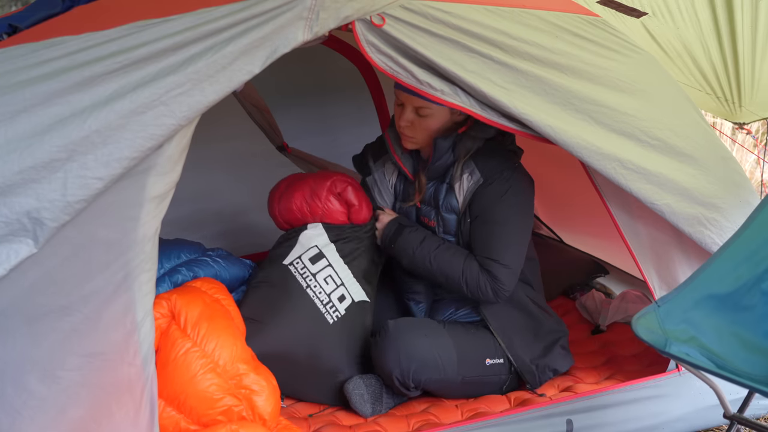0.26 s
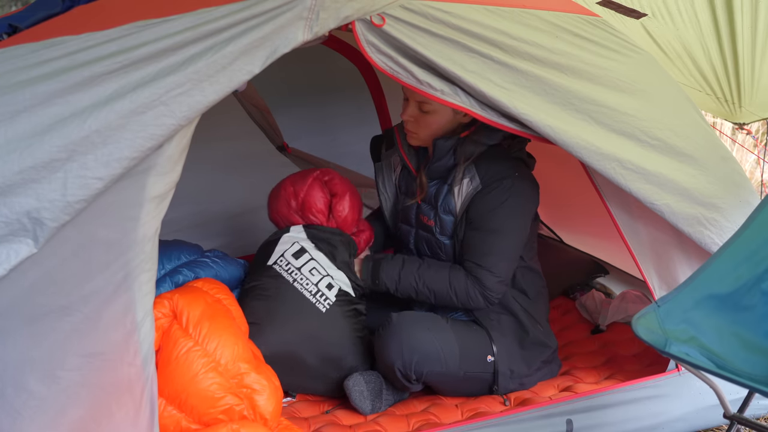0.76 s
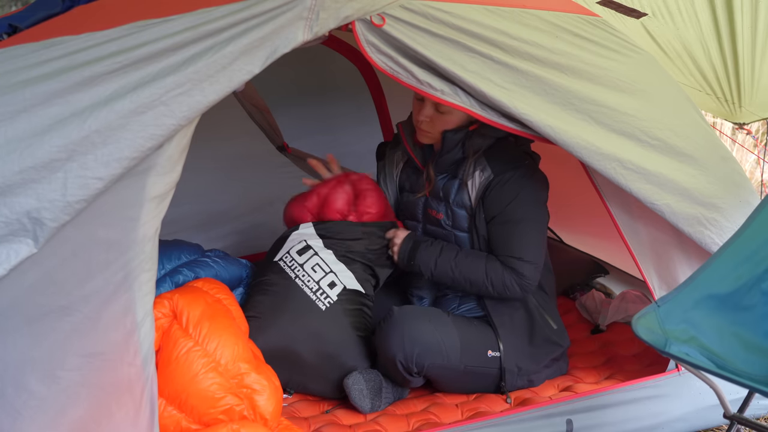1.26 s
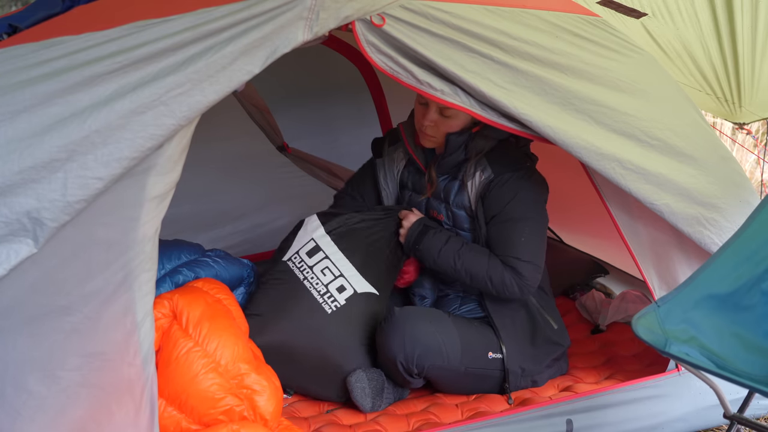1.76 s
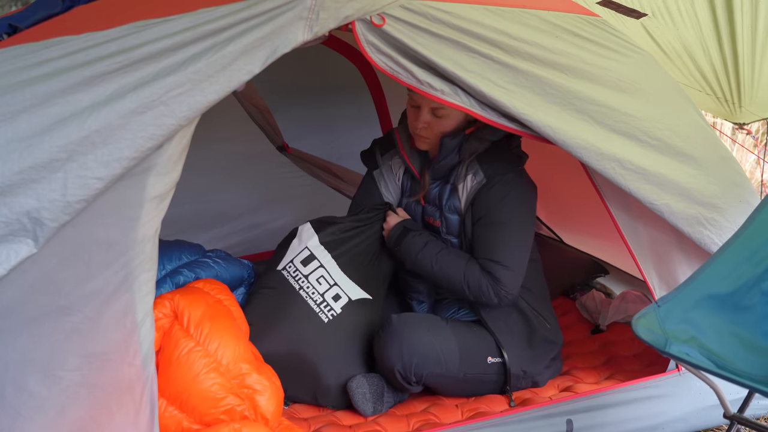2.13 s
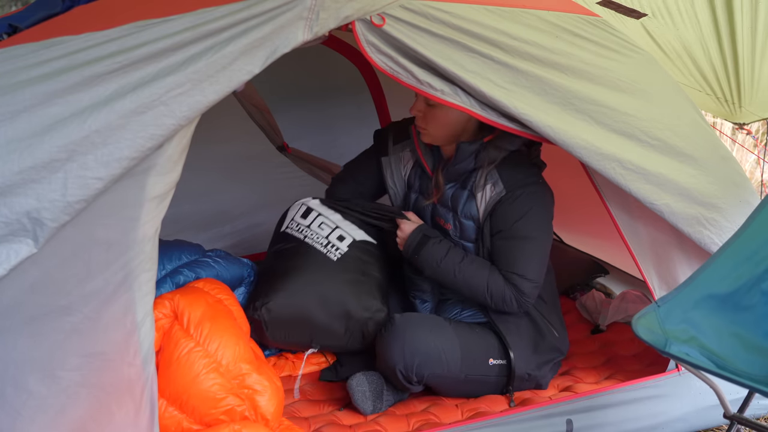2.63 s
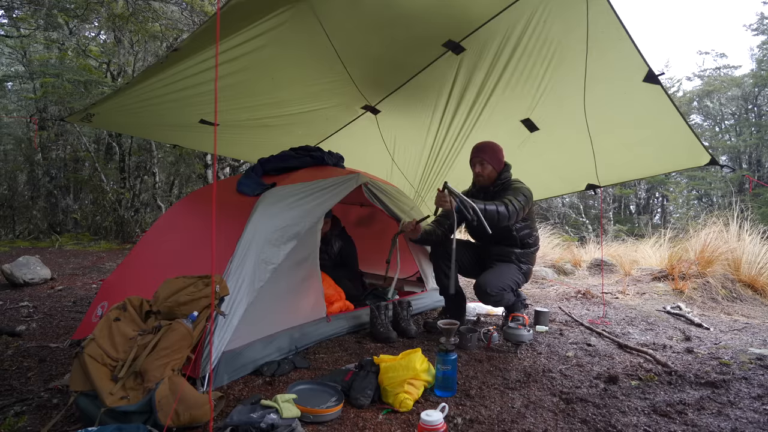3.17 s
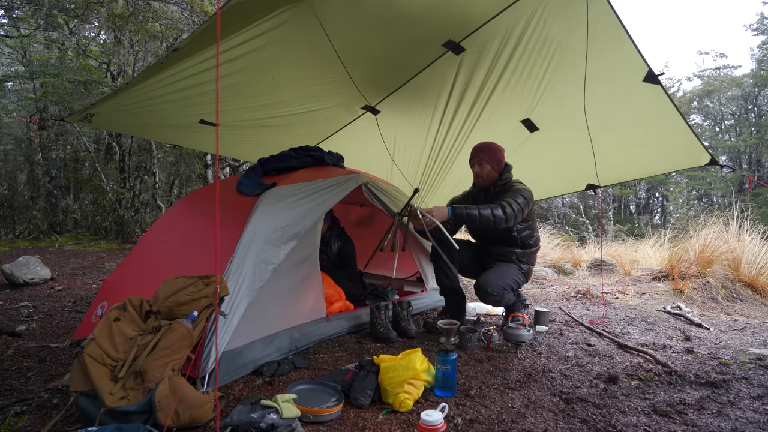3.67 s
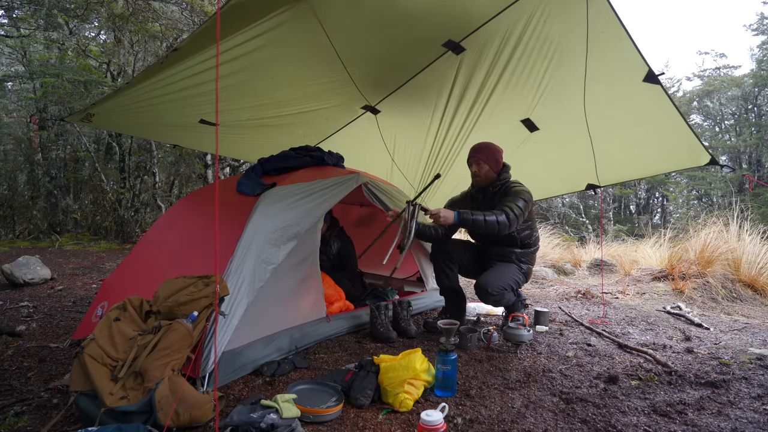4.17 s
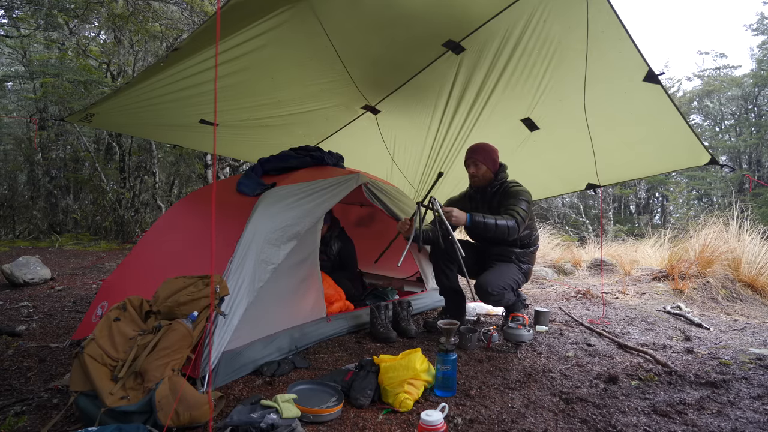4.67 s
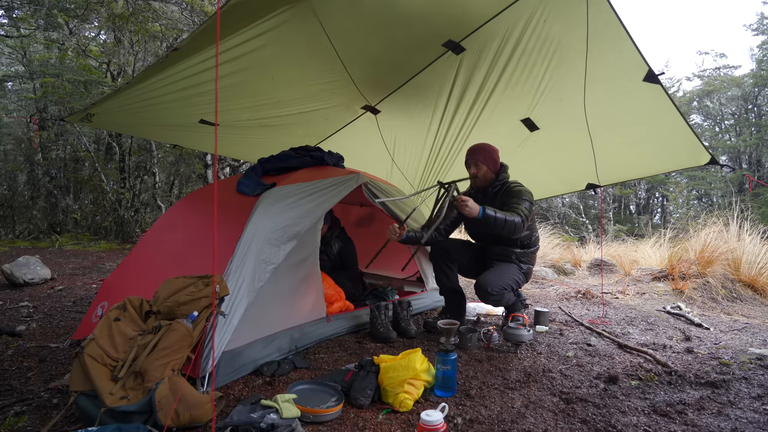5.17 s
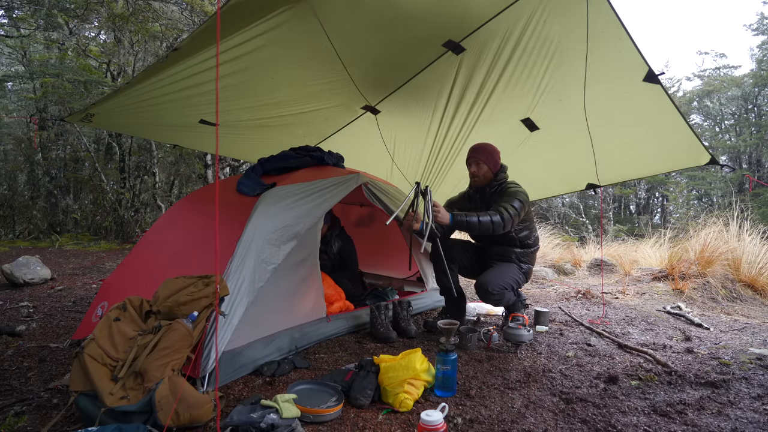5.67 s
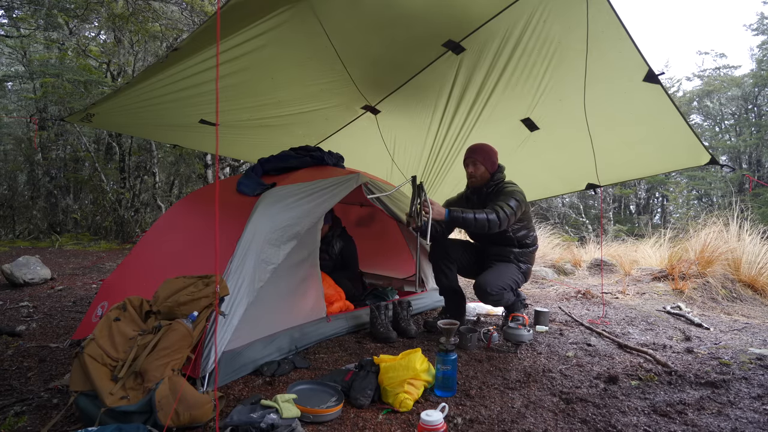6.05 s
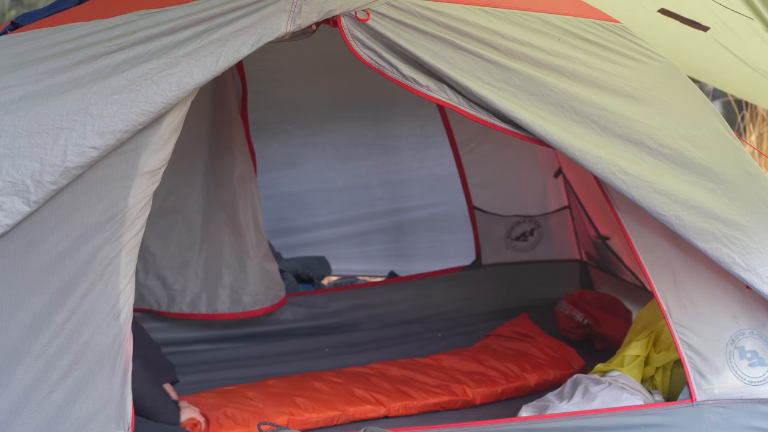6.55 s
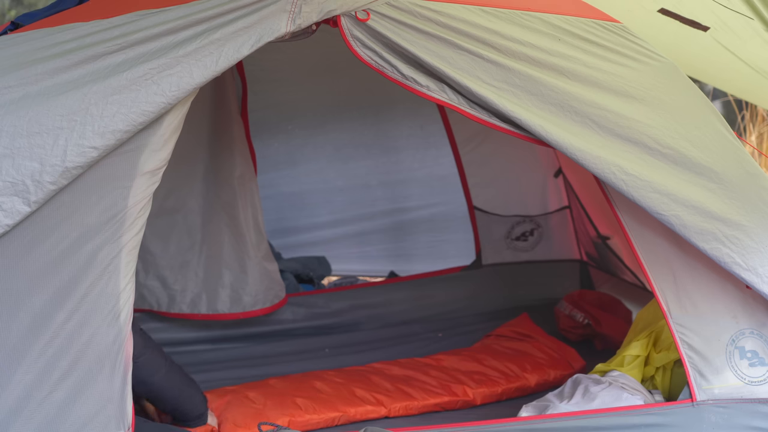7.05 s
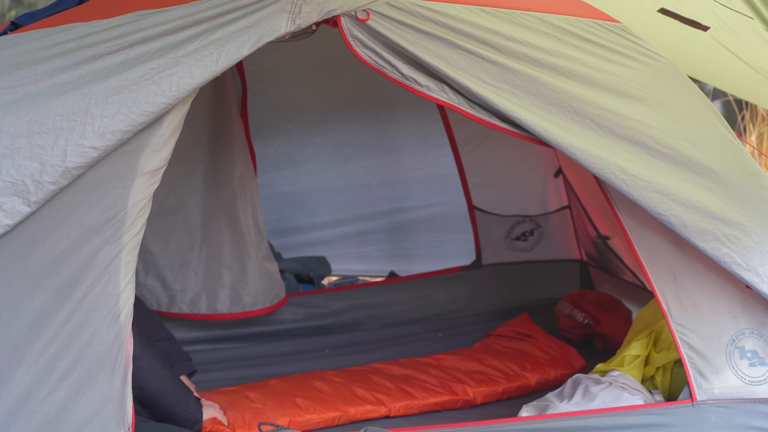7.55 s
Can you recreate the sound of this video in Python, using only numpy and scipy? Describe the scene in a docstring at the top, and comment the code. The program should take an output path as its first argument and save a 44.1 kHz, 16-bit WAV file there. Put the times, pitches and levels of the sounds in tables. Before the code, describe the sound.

From 0 to 2.9 s, close at a tent door, slippery nylon is pushed into a sack. A strong bright swish opens, with a hard cloth snap at 0.14 s; shorter, softer hisses follow to 0.9 s, with a dull bump near 0.7. Quiet reswelling, pops around 1.3, then a growing push and a fuller, longer swish from 1.8 to 2.15, and weaker rubs to 2.85. At about 2.9 the place changes to open forest: light metal tubes graze and tick, then clack densely from 3.3 to 4.15, sparser until 4.8. A sharp crack at 4.9 leads to strong, ringing clacks around 5.15, 5.36, 5.47, 5.62 and 5.88, with a last crack near 6.17. From 6.25 to 8 s, a pad is pressed in soft, dull rustles with tiny ticks. A distant stream murmurs low, fainter during the chair.

```python
"""Packing up a forest camp

A nylon sleeping bag slides into its stuff sack: noise hisses with each push, and short pulses snap the cloth taut.
Corded metal tubes of a folding chair clack together over a tarp: each contact rings a dense set of modes.
Last, a sleeping pad is pressed and rustles softly, while low noise murmurs as a far-off stream.
Sack and pad are heard at the tent door, the chair in the open; both output channels are alike."""
import sys
import numpy as np
from scipy import signal
from scipy.fft import rfft, irfft, next_fast_len
from scipy.io import wavfile
from scipy.ndimage import uniform_filter1d

SR = 44100
rng = np.random.default_rng(int(sys.argv[2]) if len(sys.argv) > 2 else 0)


def materialize(psi):
    """Save the field psi as 16-bit PCM at rate SR to the path in sys.argv[1].

    A 1-D psi becomes a single channel; in a 2-D psi each row is a channel.
    """
    bounded = np.clip(np.atleast_2d(psi).T, -1, 1)
    quanta = np.round(bounded * 32767).astype(np.int16)
    wavfile.write(sys.argv[1], SR, quanta)


N = 344411

# the microphone stands in the open between these times, at the tent door otherwise
OPEN_FROM_S, OPEN_TO_S = 2.88, 6.25
# moves while folding the chair: (start [s], length [s], level [dB], swell over the move [dB])
MOVES = [(2.97, 0.035, -41, -4), (3.479, 0.7, -47.5, -0.5), (4.279, 0.13, -47, -0.5),
         (5.053, 0.043, -35, 1), (5.132, 0.19, -46, -4)]
# light touches of tube on tube: hollower than full blows, with a short chatter
TOUCH_HOLLOW_DB, TOUCH_CHATTER_S = 5.5, 0.0026


def amp(db):
    """Amplitude factor of a level in dB."""
    return 10 ** (np.asarray(db) / 20)


def unit(x):
    """Scales x to an rms of 1."""
    return x / np.sqrt(np.mean(x ** 2) + 1e-20)


def add(mix, start_s, sound):
    """Adds a sound into the mix in place, cut at the mix's end."""
    part = mix[max(round(start_s * SR), 0):][:len(sound)]
    part += sound[:len(part)]


def during(from_s, to_s):
    """1 between two times, with short fades."""
    t = np.arange(N) / SR
    return uniform_filter1d(1. * ((t >= from_s) & (t <= to_s)), size=300)


def colour(x, points):
    """Filters x by a spectrum of (frequency [Hz], gain [dB]) points."""
    size = next_fast_len(len(x) + 2048)
    hz, db = np.transpose(points)
    bin_hz = np.fft.rfftfreq(size, 1 / SR)
    gain = amp(np.interp(np.log(bin_hz + 1), np.log(hz), db))
    return irfft(rfft(x, size) * gain, size)[:len(x)]


def band(x, low_hz, high_hz, order=2):
    """Butterworth band-pass."""
    edges_hz = np.clip([low_hz, max(high_hz, low_hz + 10)], 10, SR / 2 - 100)
    return signal.sosfilt(signal.butter(order, edges_hz, "band", fs=SR, output="sos"), x)


def thirds(x):
    """Splits a sound into body, middle and treble that sum to the whole."""
    body = colour(x, [(1600, 0), (2400, -12), (4000, -60)])
    treble = colour(x, [(4500, -60), (7000, -12), (9500, 0)])
    return body, x - body - treble, treble


def slips(per_s, spread_db):
    """Tiny slips of a rubbing contact: mostly small, a few large."""
    size = amp(spread_db * np.minimum(rng.exponential(1, N), 6))
    happens = rng.random(N) < per_s / SR
    return unit(size * rng.standard_normal(N) * happens)


def waver(depth_db, size):
    """Slow chance changes of contact pressure, smoothed twice over size samples."""
    smooth = uniform_filter1d(uniform_filter1d(rng.standard_normal(N), size), size)
    return amp(depth_db * unit(smooth))


def stroke(start_s, length_s, db, swell_db, rise_s, stop_db_per_s):
    """Power of one rubbing stroke: it gets going, swells or eases while it lasts, then dies away."""
    t = np.arange(max(-start_s, 0), length_s + .5, 1 / SR)
    attack = np.sin(np.pi / 2 * np.clip(t / rise_s, 0, 1)) ** 2
    hold_db = db + swell_db * (np.clip(t / length_s, 0, 1) - .5)
    stop_db = stop_db_per_s * np.maximum(t - length_s, 0)
    power = np.zeros(N)
    add(power, start_s, attack * amp(hold_db - stop_db) ** 2)
    return power


def strokes(rows, rise_s, stop_db_per_s):
    """Power of the middle and of the treble over a run of strokes."""
    middle, treble = np.zeros(N), np.zeros(N)
    for *shape, treble_db in rows:
        power = stroke(*shape, rise_s, stop_db_per_s)
        middle += power
        treble += power * amp(treble_db) ** 2
    return middle, treble


def swells(rows, width):
    """Short swells of noise in a narrow band; width is a share of the centre frequency."""
    out = np.zeros(N)
    for s, db, hz, length_s in rows:
        tone = band(rng.standard_normal(SR), hz / (1 + width), hz * (1 + width))
        tone = tone[-int(length_s * SR):]  # after the filter has settled
        add(out, s, amp(db) * unit(tone * np.hanning(len(tone))))
    return out


def stuffing(rest_db=-60):
    """The weave hisses with each push and as the bag swells back; creases add a fine crackle."""
    # pushes of nylon over nylon:
    # (start [s], length [s], level [dB], swell over the push [dB], treble [dB re middle])
    pushes = [(-0.04, 0.15, -31.5, 1.5, 3.5), (0.255, 0.19, -40.5, 3.5, -2), (0.44, 0.098, -44.5, -1, 1),
              (0.52, 0.16, -41.5, 0, 3.2), (0.67, 0.11, -38.5, 1.5, 5), (0.8, 0.16, -48, -4.5, 2.5),
              (1.17, 0.33, -47, 10.5, 2.5), (1.48, 0.13, -44, 2, 0), (1.56, 0.26, -41.5, 5, 7.5),
              (1.81, 0.34, -34.5, 4, 2.5), (2.32, 0.23, -43, -0.5, -1), (2.52, 0.085, -38.5, -0.5, 2.5),
              (2.6, 0.26, -46, -2.5, -0.5)]
    # spectrum of rubbed nylon: (frequency [Hz], gain [dB])
    nylon = [(180, -44), (300, -4.5), (432, -18), (622, -2.5), (972, -4.5), (1150, -7), (1290, -2.5),
             (1600, -5.5), (2120, 0), (3480, -0.5), (3910, 2), (5440, 0), (13800, 5), (15700, -0.5)]
    rise_s, stop_db_per_s = 0.047, 298
    middle_power, treble_power = strokes(pushes, rise_s, stop_db_per_s)
    # between pushes the squeezed bag swells back
    loft = stroke(0.91, 0.3, -52.5, 0, rise_s, stop_db_per_s)
    loft += amp(rest_db) ** 2
    # the body grows less than the push, so hard pushes are thinner
    body_at_ref_db, body_slope, ref_db = -45.5, 0.85, -40
    push_db = 10 * np.log10(middle_power + loft)
    body_db = body_at_ref_db + body_slope * (push_db - ref_db)

    creases = slips(per_s=2500, spread_db=3.2)
    weave = rng.standard_normal(N) + amp(-8) * creases
    parts = thirds(tent(colour(weave, nylon)))
    body, middle, treble = (unit(part * waver(depth_db=0.6, size=400)) for part in parts)
    hiss = amp(body_db) * body
    hiss += np.sqrt(middle_power + loft) * middle
    hiss += np.sqrt(treble_power + loft) * treble
    return hiss * during(0, OPEN_FROM_S)


def tent(x, bounce_db=-13):
    """A few close bounces off the floor and the walls ripple the spectrum."""
    taps = np.zeros(SR // 50)
    delays = rng.integers(SR // 800, SR // 100, size=5)
    taps[delays] = amp(bounce_db) * rng.choice([-1, 1], size=5)
    taps[0] = 1
    return signal.oaconvolve(x, taps / np.linalg.norm(taps))[:N]


def snaps():
    """A panel of cloth jerks taut or a crease pops: one pressure pulse, then a short flutter."""
    # (time [s], pulse peak [dB], centre [Hz], flutter decay [s], flutter level [dB re pulse])
    snap_rows = [(0.012, -19.5, 197, 0.0085, -2.5), (0.130, -19, 537, 0.011, 0),
                 (0.1362, -6.5, 640, 0.004, -12.5), (0.139, -13.3, 172, 0.0092, -22),
                 (0.165, -28, 600, .004, -7), (0.269, -29, 484, 0.0066, -7),
                 (0.406, -26, 5000, 0.00089, -15), (0.782, -31.5, 453, .004, -6),
                 (1.251, -27, 4200, 0.0043, -4.5), (1.251, -29.5, 1000, .004, -23),
                 (1.3, -20, 640, 0.0035, -15), (1.2993, -19, 2710, 0.0011, -5),
                 (1.324, -28, 3500, .003, -0.5), (2.247, -34, 680, .004, -22), (2.281, -31, 435, .004, -6),
                 (2.669, -29, 6300, 0.0017, -14), (3.153, -34.5, 382, 0.0097, -2),
                 (3.1515, -26, 2470, 0.0028, -6.5), (3.234, -27.5, 828.5, 0.0054, -3),
                 (3.236, -33, 340, 0.0092, 0.5), (3.446, -20, 834, 0.0027, -16.5),
                 (3.447, -26.5, 290, 0.011, -12), (3.513, -33, 700, 0.003, -0.5),
                 (6.428, -36.5, 1970, 0.0076, -3.5), (6.431, -32, 400, .006, -3),
                 (6.828, -31.5, 4100, 0.0044, -8), (6.926, -26.5, 6200, 0.0012, -9),
                 (7.648, -32, 3160, 0.0097, -6.5), (7.758, -39, 1500, 0.0018, -6)]
    out, t = np.zeros(N), np.arange(-SR // 200, SR // 10) / SR
    for s, db, hz, flutter_s, flutter_db in snap_rows:
        u = (np.pi * hz * t) ** 2
        pulse = (2 * u - 1) * np.exp(-u)
        flutter = unit(band(rng.standard_normal(len(t)), hz * 0.57, hz * 2.18, order=3))
        flutter *= (t > 0) * (1 - np.exp(-u)) * np.exp(-abs(t) / flutter_s)
        add(out, s + t[0], amp(db) * (pulse + amp(flutter_db) * flutter))
    return out


def folds(sack_db=-59, pad_db=-63):
    """Loose folds of the sack and of the pad flop over at random: small dull puffs."""
    puffs = unit(band(slips(per_s=110, spread_db=1.2), 250, 1200))
    level = amp(sack_db) * during(0, OPEN_FROM_S) + amp(pad_db) * during(OPEN_TO_S, N / SR)
    return puffs * level


def bumps():
    """The soft bag bumps the floor: brief swells of low noise."""
    # (time [s], rms level [dB], centre [Hz], length [s])
    bump_rows = [(0.712, -36.5, 140, .085), (1.52, -43.5, 114, 0.03)]
    return swells(bump_rows, width=0.37)


def chair():
    """Tubes of the folding frame graze, clack and rebound, with sharp cracks; open tubes ping."""
    # tube on tube: (time [s], level [dB], hollowness [dB], brightness [dB], chatter [s],
    # strongest ring [Hz], first graze before the blow [s], rebound after it [s]); 0 = none
    clacks = [(2.9531, -31.5, -1, 6, 0.013, 3470, 0.0058, 0),
              (2.9723, -30, 4, 3.5, 0.0032, 3880, 0.00087, 0),
              (3.0552, -32.5, 3, -3, 0.0023, 10500, 0.0067, 0),
              (3.0871, -32, 3.5, 1, 0.0058, 3900, 0, 0.0018),
              (3.1878, -28, 2, 0, 0.0021, 3930, 0.003, 0.00064),
              (3.2869, -19, 0.5, 0.5, 0.0026, 4470, 0.021, 0),
              (3.3576, -19.5, -1, 0, 0.018, 5800, 0, 0.00052),
              (3.37, -19.5, -1, 6.5, 0.0054, 9800, 0.0048, 0.00084),
              (3.406, -26, -4, 7, 0.0022, 6850, 0.012, 0.0024),
              (3.481, -27.5, 3, -1, 0.002, 4370, 0.001, 0), (3.5565, -22, 4, 3, 0.0074, 2940, 0, 0),
              (3.609, -34, -9, 3, 0.0047, 3930, 0, 0.00065), (3.6534, -14, 2.5, 6, 0.0064, 4920, 0, 0.017),
              (3.7218, -18, 0, 12, 0.0055, 4800, 0.013, 0),
              (3.79, -31.5, -3, 1, 0.0095, 4410, 0.013, 0.00048), (3.83, -19, -2, 8, 0.0082, 6400, 0, 0),
              (3.9693, -21, -6, 10, 0.005, 15200, 0.016, 0.0015),
              (4.0209, -24, 1.5, 4.5, 0.0067, 3860, 0.013, 0),
              (4.0636, -20, -3, 1, 0.0083, 4533, 0.0018, 0), (4.0703, -21.5, -1, -7, 0.0011, 4200, 0, 0),
              (4.1285, -19, -4.5, 3, 0.0023, 4600, 0, 0.00019), (4.2728, -40, 1, -5, 0.00081, 4010, 0, 0),
              (4.367, -36.5, 10, 2.5, 0.0032, 6996, 0.00084, 0),
              (4.4805, -22, 2.5, 3.5, 0.0023, 15120, 0.026, 0), (4.6048, -36, 7.5, -8, 0.0021, 4160, 0, 0),
              (4.8853, -21.5, 1.5, 8.5, 0.0032, 7346, 0.012, 0.018),
              (4.986, -20.5, 4, 1.5, 0.0039, 5235, 0, 0),
              (5.062, -30.5, 5, 1, 0.0022, 3384, 0.0072, 0.0022),
              (5.0874, -29.5, 3, -4, 0.00098, 3130, 0.0075, 0),
              (5.1348, -19, 1, 2, 0.015, 4460, 0.00025, 0.0005),
              (5.1406, -15, 2.5, 2, 0.00344, 3065, 0.00089, 0), (5.2799, -28, 3, 1.5, 0.0037, 5600, 0, 0),
              (5.363, -13.5, 0, -6.5, 0.0083, 5660, 0.0055, 0),
              (5.3953, -25.5, -10, 1, 0.0074, 3270, 0.0018, 0.0015),
              (5.4693, -16.3, -0.5, 5.5, 0.0066, 7440, 0.017, 0.01),
              (5.5169, -27.5, 0.5, -7, 0.00081, 4280, 0, 0.002),
              (5.558, -28.5, 4, -16, 0.0023, 2562, 0.00038, 0),
              (5.6242, -17.5, 2, 4, 0.0046, 5900, 0, 0.0084),
              (5.868, -33.5, -1, -6, 0.00054, 4650, 0.0024, 0),
              (5.885, -18.5, -4, 5.5, 0.0079, 4040, 0, 0.00019),
              (6.132, -27.5, -4.5, 6.5, 0.0064, 3740, 0.028, 0), (6.1725, -34, -7, 1, 0.00095, 4330, 0, 0)]
    # a tube end seats dry into its socket with a sharp crack, mostly within a clack: (time [s], level [dB])
    cracks = [(3.189, -19), (3.969, -24), (4.130, -6.5), (4.885, -10), (4.892, -2), (6.150, -16),
              (6.175, -10), (6.246, -25)]
    # the air in an open tube pings: (time [s], level [dB], frequency [Hz])
    pings = [(3.287, -20.5, 1385), (5.108, -31, 1345), (5.258, -36.5, 1466), (5.3628, -24, 1064),
             (5.395, -29, 1170), (5.776, -41, 1325), (5.969, -37, 1350), (6.197, -42, 2120),
             (6.222, -50, 1490)]
    # grazes and rebounds are weaker than their blow
    graze_db, graze_bright_db, graze_hz = -17, -1, 4700
    rebound_db, rebound_dull_db, rebound_chatter_s = -3.5, -9.5, 0.004
    out, t = np.zeros(N), np.arange(SR // 200) / SR
    for s, db, hollow_db, bright_db, chatter_s, ring_hz, graze_s, rebound_s in clacks:
        add(out, s, clack(db, hollow_db, bright_db, chatter_s, ring_hz))
        if graze_s:
            graze = clack(db + graze_db, TOUCH_HOLLOW_DB, graze_bright_db, TOUCH_CHATTER_S, graze_hz)
            add(out, s - graze_s, graze)
        if rebound_s:
            dulled_db = bright_db + rebound_dull_db
            rebound = clack(db + rebound_db, hollow_db, dulled_db, rebound_chatter_s, ring_hz)
            add(out, s + rebound_s, rebound)
    for s, db in cracks:
        add(out, s, amp(db) * np.cos(2 * np.pi * 7000 * t) * np.exp(-t / .00015))
    for s, db, hz in pings:
        add(out, s, ping(db, hz))
    return band(out + rattle(), 456, 21950, order=3)  # nothing of the chair sounds below about 450 Hz


def clack(db, hollow_db, bright_db, chatter_s, ring_hz,
          ring_t60=0.094, crack_db=3, tail_db=-21, tail_t60=0.38, settle_db=-17):
    """Two tubes meet, chatter and settle on their cord; each contact cracks and feeds the ring anew."""
    t = np.arange(SR * 2 // 5) / SR
    contacts = np.zeros(len(t))
    contacts[0] = 1
    for k, (when, force, later) in enumerate(rng.random(size=(3, 3))):
        chatter_at_s = (k + when) / 3 * chatter_s
        contacts[1 + int(chatter_at_s * SR)] += .6 + .4 * force
        settle_at_s = .012 + .08 * later
        contacts[int(settle_at_s * SR)] += amp(settle_db) * force
    crack = amp(crack_db) * np.exp(-t / .0005)
    ring = amp(-60 * t / ring_t60)
    returns = amp(tail_db - 60 * t / tail_t60)  # scattered back by tarp, ground and trunks
    one_contact = (crack + ring) ** 2 + returns ** 2
    energy = abs(signal.fftconvolve(contacts ** 2, one_contact)[:len(t)])
    body, middle, treble = thirds(tube_ring(ring_hz, size=len(t)) * np.sqrt(energy))
    sound = amp(hollow_db) * body + middle + amp(bright_db) * treble
    return amp(db) * sound / np.std(middle[:SR // 110])  # level set by the middle's first 9 ms


def tube_ring(ring_hz, size, ring_db=8.0, ring_width_hz=280):
    """The dense ring of the frame; where the blow lands sets which resonances stand out."""
    # resonances of the tubes: (centre [Hz], width [Hz], mean level [dB above the weaker modes])
    tube_modes = [(420, 23, -3), (1330, 120, -1.5), (2376, 114, 3.5), (2700, 320, 3), (3220, 116, 4),
                  (3875, 420, 3.5), (4530, 120, 1), (5600, 160, -10), (6024, 160, 4.5), (6800, 380, 2),
                  (7940, 240, 0), (9560, 180, 2), (10220, 320, 5), (12620, 760, 2), (14440, 470, 2.5)]
    # spectrum of the crowd of weaker modes, shaping the whole ring: (frequency [Hz], gain [dB])
    frame = [(100, -52), (280, -35), (420, -16), (700, -21), (1200, -4.5), (1700, -7.5), (2700, -1.5),
             (4000, 0), (6000, 2), (8000, -3), (9800, -7.5), (11200, -13), (12600, -12.5), (14000, -15),
             (15500, -11.5)]
    hz = np.fft.rfftfreq(size, 1 / SR)
    centre_hz, width_hz, db = np.transpose(tube_modes)
    db = db + 3.5 * rng.standard_normal(len(db))
    centre_hz = centre_hz * (1 + .012 * rng.standard_normal(len(db)))
    detune = 2 * (hz - centre_hz[:, None]) / width_hz[:, None]
    power = 1 + amp(db) ** 2 @ (1 / (1 + detune ** 2)) ** 2
    power += amp(ring_db) ** 2 / (1 + (2 * (hz - ring_hz) / ring_width_hz) ** 2)
    modes = np.sqrt(power) * np.exp(2j * np.pi * rng.random(len(hz)))
    return unit(colour(irfft(modes, size), frame))


def ping(db, hz, t60=0.071):
    """A scuffed knock on an open tube briefly sounds the air inside."""
    t = np.arange(SR // 6) / SR
    scuff = unit(band(rng.standard_normal(len(t)), hz, hz * 1.8, order=1))
    air = np.sin(2 * np.pi * hz * t) + .45 * scuff
    return air * (1 - np.exp(-t / 0.00087)) * amp(db - 60 * t / t60)


def rattle():
    """Loose corded tubes touch lightly at uneven intervals during each move, harder in a brisk one."""
    gap_s, ring_hz = 0.045, 3950
    level_db, spread_db, bright_db = 1.5, 4, -5.5  # level re the move
    out = np.zeros(N)
    for start_s, length_s, move_db, _ in MOVES:
        for s in np.arange(start_s, start_s + length_s - gap_s / 2, gap_s):
            late, force = rng.random(), rng.uniform(-1, 1)
            touch_db = move_db + level_db + spread_db * force
            touch = clack(touch_db, TOUCH_HOLLOW_DB, bright_db, TOUCH_CHATTER_S, ring_hz)
            add(out, s + late * gap_s, touch)
    return out


def scrape(rest_db=-72):
    """Tubes slide and scrape softly as the chair is folded."""
    # spectrum of the scrape: (frequency [Hz], gain [dB])
    sliding_tubes = [(300, -7), (1000, 1), (2200, -3.5), (3900, 8.5), (5500, -5), (7500, -1.5),
                     (11000, -14), (15500, -4.5)]
    power = amp(rest_db) ** 2
    power = power + sum(stroke(*move, rise_s=0.055, stop_db_per_s=207) for move in MOVES)
    grain = slips(per_s=9000, spread_db=1.5) * waver(depth_db=3, size=400)
    return np.sqrt(power) * unit(colour(grain, sliding_tubes)) * during(OPEN_FROM_S, OPEN_TO_S)


def squeaks():
    """A tube end squeaks faintly: a narrow resonance driven by friction."""
    # (time [s], rms level [dB], centre [Hz], length [s])
    squeak_rows = [(3.055, -45.5, 10360, 0.045), (3.055, -51, 12100, .04), (4.74, -55.5, 14900, 0.029),
                   (4.775, -58, 14600, .05)]
    return swells(squeak_rows, width=0.01)


def pressing():
    """Coated fabric rubs and crinkles softly under the hands and sounds the hollow pad."""
    # presses of the hands on the pad:
    # (start [s], length [s], level [dB], swell over the press [dB], treble [dB re middle])
    presses = [(6.25, 0.18, -49.5, 1, -2), (6.52, 0.25, -54, -2, -4), (6.78, 0.15, -51, -2.5, -2),
               (7.04, 0.25, -52.5, 6, -1), (7.48, 0.14, -58, -3, -3), (7.69, 0.11, -51.5, 3, 0)]
    # spectrum of the rubbed pad: (frequency [Hz], gain [dB])
    pad = [(120, -27), (200, -4), (386, -1), (718, -3), (1110, -7.5), (1200, -5), (2110, -7), (3710, -4.5),
           (5060, -7.5), (5450, -6), (15700, -8.5)]
    rest_db, body_db = -60, -0.5
    middle_power, treble_power = strokes(presses, rise_s=0.044, stop_db_per_s=128)
    rest = amp(rest_db) ** 2
    creases = slips(per_s=1200, spread_db=2.8)
    parts = thirds(colour(rng.standard_normal(N) + amp(-4.5) * creases, pad))
    body, middle, treble = (unit(part * waver(depth_db=1.55, size=600)) for part in parts)
    rub = np.sqrt(middle_power + rest) * (middle + amp(body_db) * body)
    rub += np.sqrt(treble_power + rest / 2) * treble
    return rub * during(OPEN_TO_S, N / SR)


def stream():
    """Distant water and forest air: a steady low wash of noise, fuller at the tent door."""
    # spectrum at the tent door: (frequency [Hz], gain [dB])
    near_spectrum = [(25, -43), (50, -5.5), (90, 6), (160, 5.5), (300, 0), (430, -3.5), (650, -2),
                     (1000, -8.5), (2000, -15.5), (5000, -14.5), (15000, -22)]
    # spectrum in the open: (frequency [Hz], gain [dB])
    open_spectrum = [(25, -32), (50, -8.5), (90, 10), (160, 2.5), (300, 3), (600, 1), (1200, -5.5),
                     (2500, -10), (6000, -16.5), (15000, -19)]
    sack_db, open_db, pad_db = -48.5, -56, -52
    at_door = amp(sack_db) * during(0, OPEN_FROM_S) + amp(pad_db) * during(OPEN_TO_S, N / SR)
    in_open = amp(open_db) * during(OPEN_FROM_S, OPEN_TO_S)
    near = at_door * unit(colour(rng.standard_normal(N), near_spectrum))
    return near + in_open * unit(colour(rng.standard_normal(N), open_spectrum))


def scene():
    """All sources reach one microphone."""
    cloth = stuffing() + snaps() + folds() + bumps() + pressing()
    mono = cloth + chair() + scrape() + squeaks() + stream()
    return np.array([mono, mono])


def record(dry):
    """Only the very loudest peaks are rounded off; then the microphone's bass cut and the band limit."""
    edge_hz = 15850
    rounded = dry / (1 + (dry / .8) ** 8) ** (1 / 8)
    thinned = np.array([colour(side, [(20, -10), (40, -4), (70, 0)]) for side in rounded])
    lowpass = signal.firwin(401, edge_hz, window=("kaiser", 8), fs=SR)
    return signal.oaconvolve(thinned, lowpass[None], "same")


dry = scene()
out = record(dry)
materialize(out)
```